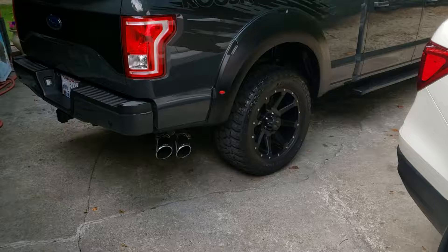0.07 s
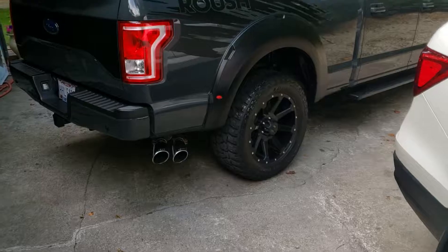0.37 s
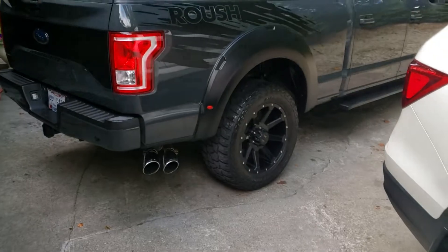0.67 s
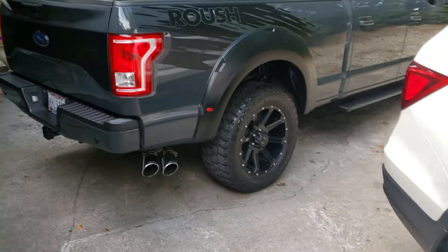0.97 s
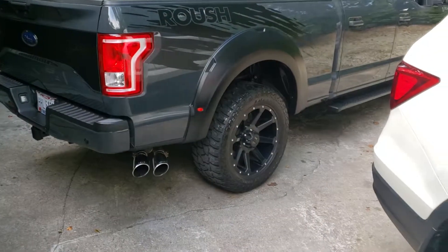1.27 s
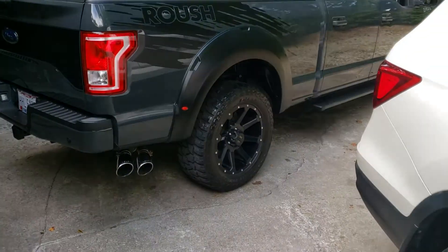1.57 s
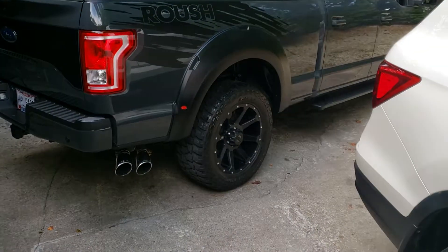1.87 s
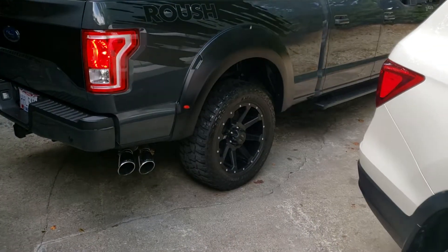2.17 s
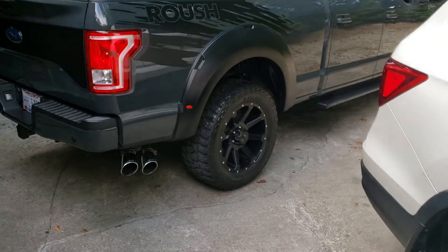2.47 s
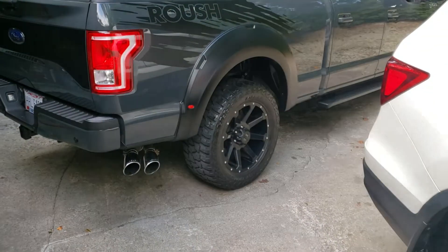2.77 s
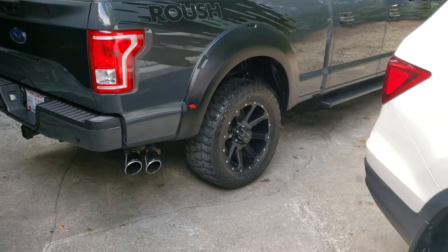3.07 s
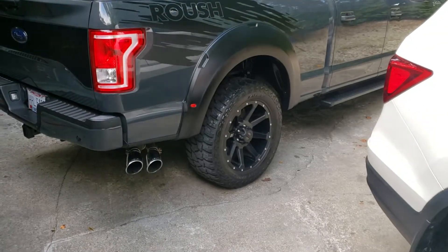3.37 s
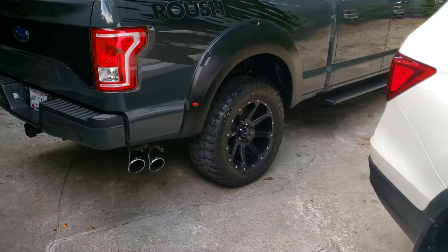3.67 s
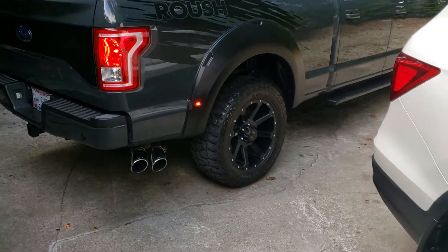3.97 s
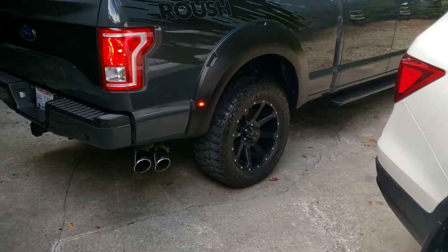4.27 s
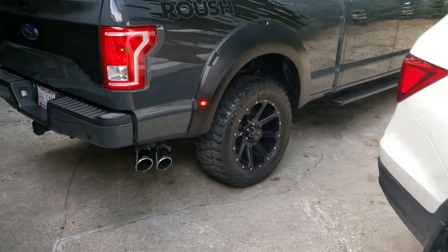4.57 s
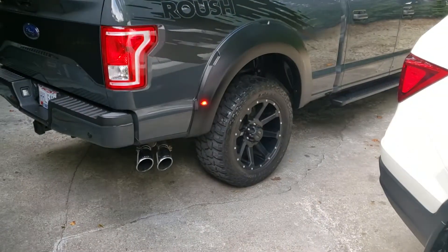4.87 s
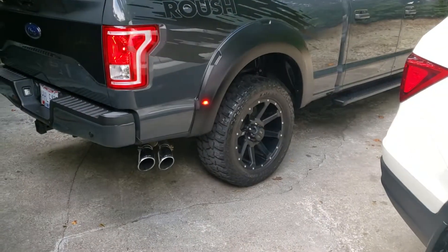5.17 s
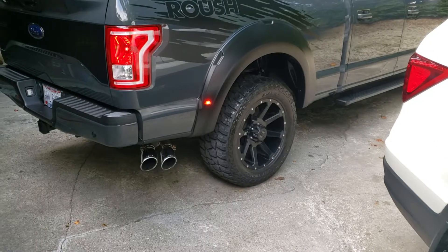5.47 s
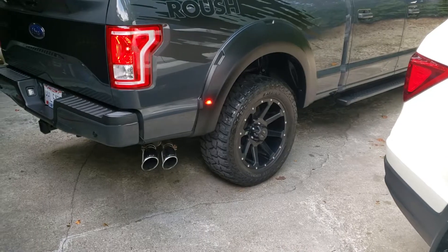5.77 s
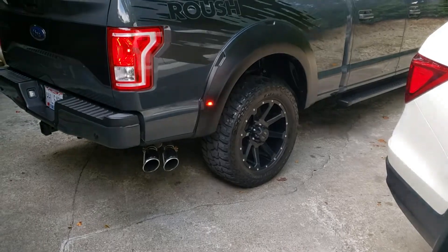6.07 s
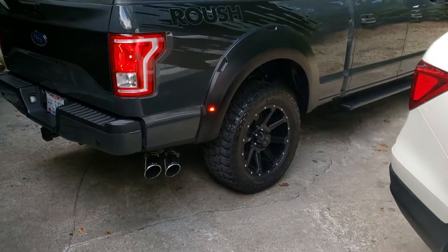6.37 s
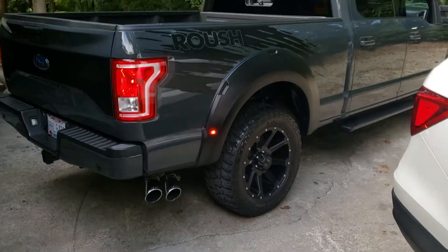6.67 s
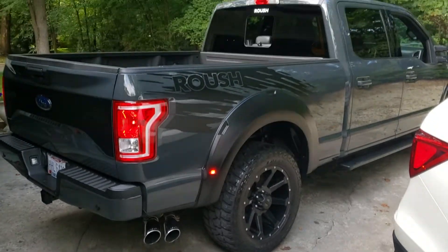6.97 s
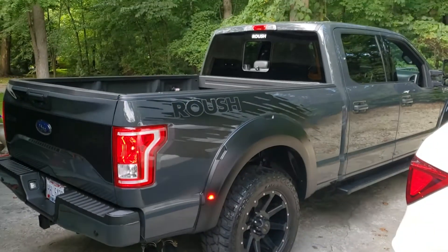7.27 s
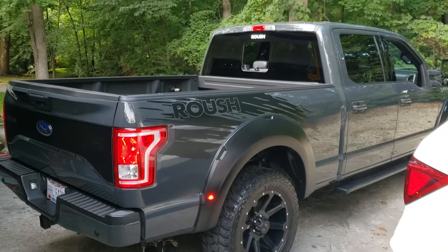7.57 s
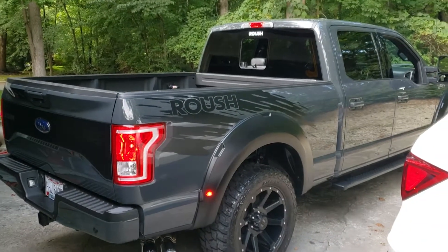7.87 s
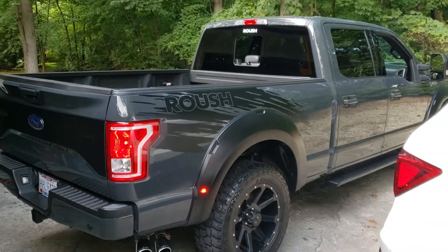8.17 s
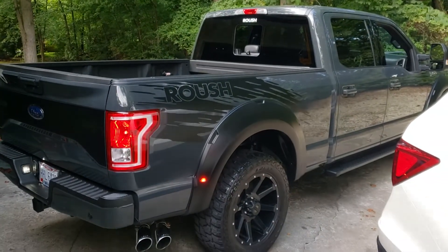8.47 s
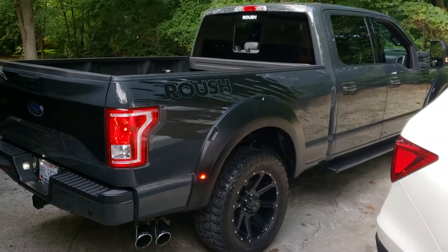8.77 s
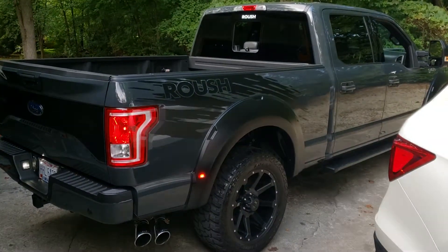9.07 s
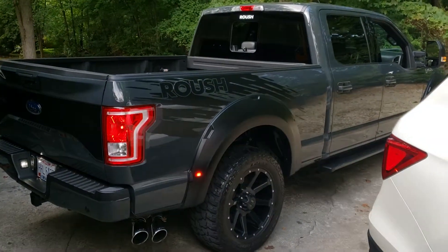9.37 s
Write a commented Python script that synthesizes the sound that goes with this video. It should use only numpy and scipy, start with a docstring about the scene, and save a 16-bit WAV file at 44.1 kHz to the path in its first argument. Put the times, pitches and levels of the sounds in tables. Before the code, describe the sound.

After a few quiet ticks and thumps, a pickup truck cranks and starts outdoors, idling with a chugging exhaust rumble.

```python
"""A V8 pickup starts up on a driveway, a few metres from the listener. Its starter motor clashes in and
cranks for 0.7 s; the engine catches with a few barks, revs up and settles to an uneven fast idle.
Each firing makes the exhaust pipes ring and adds a rasp of gas, while the engine bay clatters and hisses.
Before the start come dry ticks, soft thumps and thin squeaks, over a low, wavering two-note hum
that slowly fades."""
import sys
import numpy as np
from scipy import signal
from scipy.fft import rfft, irfft
from scipy.io import wavfile
from scipy.ndimage import uniform_filter1d

SR = 44100
rng = np.random.default_rng(int(sys.argv[2]) if len(sys.argv) > 2 else 0)


def master(y):
    """Save y as 16-bit WAV."""
    cut = np.clip(np.atleast_2d(y).T, -1, 1)
    pcm = np.round(cut * 32767)  # scale
    wavfile.write(sys.argv[1], SR, pcm.astype(np.int16))


N = 414981
TIME = np.arange(N) / SR
FREQS = np.maximum(np.arange(8193) * SR / 16384, 1)  # the pitches at which filters are drawn [Hz]

# Levels in the tables are relative. A "mode" is a pitch at which something likes to ring.
# how fast the engine fires (time [s], firings per second [Hz])
FIRING_RATE = [(4.9, 61.61), (4.98, 82.9), (5.04, 75.9), (5.11, 91.68), (5.2, 99.59), (5.42, 100.85),
               (5.52, 93.11), (5.8, 89.52), (6.2, 85.77), (6.5, 82.76), (7.2, 80.39), (7.7, 80.81),
               (8.25, 81.78), (8.55, 83.99), (8.75, 81.53), (9.0, 81.96), (9.41, 87.24)]
# how hard the engine works (time [s], level [dB])
ENGINE_LOAD = [(5.6, 1), (6.2, 0.5), (6.6, 0), (7.35, -1), (7.7, .7), (8.3, 4), (8.8, 3), (9.3, 4)]
# the eight cylinders in firing order (lateness [gaps between firings], level [dB], sharpness [dB])
FIRING_ORDER = [(.51, 0.9, 6), (.53, 1.8, 1), (.43, -1, 6), (.54, 1.4, 3), (0.3203, -1.1, 5.5),
                (.39, 0, 8.5), (0.4966, 0.9, 2), (0.2972, 0.5, 5.5)]
# the exhaust's deep boom, fuller body, rasp and high-rev roar (pitch [Hz], width [Hz], level [dB])
BOOM_MODES = [(50.3, 3.6, -0.5), (79.8, 18.9, 7), (113, 3.1, -18.5)]
BODY_MODES = [(148.3, 6.5, -3), (177.7, 9.45, 7), (219, 5.5, -12), (251, 10, 2), (315, 8.3, -10.5),
              (329.5, 6.3, -9), (371.7, 16, -10)]
RASP_MODES = [(460, 22, -1), (502, 12, 1), (558, 16, 2), (622, 16, -1), (696, 20, -1), (772, 26, 2),
              (840, 20, 0), (905, 12, -4), (982, 22, 2), (1080, 50, -6), (1235, 30, -10), (1370, 50, -6),
              (1510, 50, -7), (1680, 80, -9), (2950, 300, -20)]
ROAR_MODES = [(197, 21, -11), (594, 14, 14.5)]
# hard firings as the engine catches (time [s], level [dB])
CATCH_BARKS = [(4.912, -21.5), (4.954, -13.5), (4.987, -7.5), (5.0, -14), (5.097, -8.5), (5.171, -7.5),
               (5.183, -9.5), (5.193, -18), (5.251, -9), (5.273, -14), (5.361, -15.5), (5.451, -25)]
# puffs from the tailpipes while the starter turns the engine (time [s], level [dB])
CRANK_PUFFS = [(4.23, -36), (4.46, -27.5), (4.585, -36.5), (4.88, -26.5), (4.911, -11.5)]
# how fast the starter's gear teeth meet (time [s], teeth per second [Hz])
TOOTH_RATE = [(4.2, 189.8), (4.28, 200.6), (4.36, 227.8), (4.5, 248.8), (4.7, 265), (4.9, 289.7),
              (5.05, 417)]
# ringing of the metal case around the starter and its gears (pitch [Hz], width [Hz], level [dB])
HOUSING_MODES = [(332, 250, -14), (685, 81, -15.5), (935, 70, -6), (1235, 45, 3.5), (1477, 104, 0.5),
                 (1907, 33, -6), (2190, 156, -5.5), (2576, 130, -9.5), (3090, 190, -8), (3840, 300, -16.5),
                 (5440, 200, -21)]
# surges in the starter's whirr as each piston finishes squeezing its air (time [s], level [dB])
PISTON_SURGES = [(4.345, -30.5), (4.451, -29.5), (4.5, -30.5), (4.587, -26), (4.68, -26.5), (4.767, -28),
                 (4.835, -28), (4.91, -33), (4.975, -30.5)]
# whine of the starter's reduction gear (time [s], pitch [Hz])
WHINE_PITCH = [(4.24, 615), (4.35, 614), (4.49, 642), (4.57, 632), (4.64, 585), (4.69, 668)]
# the tones in that whine (multiple of the pitch, level against the whirr [dB])
WHINE_TONES = [(1, -22), (2, -8.5)]
# hiss of the starter's brushes, its sliding electric contacts (pitch [Hz], level [dB])
BRUSH_TONE = [(2500, -28), (4500, 5.5), (6500, 5), (8200, 1), (10000, 2), (13000, 2), (15500, 0.5)]
# clatter of valves and chains (pitch [Hz], width [Hz], level [dB])
CLATTER_MODES = [(1374, 140, 10.5), (1760, 100, -5.5), (2110, 17, 3), (2355, 95, 2), (2730, 74, 2),
                 (3140, 87, 1), (3850, 450, -7.5), (5140, 610, -14.5)]
# hiss of belts and fan (pitch [Hz], level [dB])
HISS_TONE = [(2500, -23), (4400, -9), (5100, 1), (6200, -6.5), (7300, -7), (10000, -8.5), (12700, -3.5),
             (16000, -13.5)]
# the loudest valve ticks (place in the cycle [firings], level [dB])
VALVE_TICKS = [(2.5, -44), (5.5, -43), (7.55, -47)]
# ringing of those valves (pitch [Hz], width [Hz], level [dB])
VALVE_MODES = [(2960, 230, 2), (5200, 600, -15)]
# dry ticks close by (time [s], level [dB], brightest pitch [Hz])
DRY_TICKS = [(1.352, -58, 2400), (1.461, -54, 2420), (1.584, -23, 2640), (1.7411, -15, 2550),
             (2.381, -38.5, 3570), (3.0785, -27, 1930), (3.1275, -22.5, 2600), (3.4542, -27, 1820),
             (3.571, -24.5, 1790), (3.584, -27, 2900), (3.5955, -27, 2740), (3.758, -30, 8800),
             (3.8357, -31.5, 8300), (4.0144, -38, 8900), (4.1604, -35, 2080)]
# the tone those ticks share (pitch [Hz], level [dB])
TICK_TONE = [(300, -36), (1000, -19), (1800, -5), (2600, -1), (3500, 0), (4500, -9), (5600, -2),
             (8500, -10), (12000, -1), (16000, -3)]
# soft thumps at the cab (time [s], level [dB], rise time [s], time to fade by 60 dB [s])
CAB_THUMPS = [(2.012, -33, 0.03, 0.31), (3.85, -40, 0.015, 0.33), (4.06, -47.5, 0.029, 0.45)]
# the dull tone of a thump (pitch [Hz], level [dB])
THUMP_TONE = [(40, -16), (90, -6), (140, 3.5), (220, -7), (310, -3.5), (450, -11.5), (1300, -8.5),
              (2500, -19), (5000, -31.5), (15000, -35.5)]
# the cab's boom after a thump (pitch [Hz], width [Hz], level [dB])
CAB_MODES = [(128.5, 4.3, 0.5), (157.7, 8, -2)]
# thin high squeaks (time [s], level [dB], time to fade by 60 dB [s])
HIGH_SQUEAKS = [(.286, -51, 0.13), (4.097, -42, 0.24)]
# the two notes of a low, wavering hum (pitch [Hz], starting level [dB])
HUM_NOTES = [(86.1, -49.5), (129.2, -51.5)]
# low outdoor rumble (pitch [Hz], width [Hz], level [dB])
RUMBLE_MODES = [(86.3, 12, 2), (138.8, 14, 0), (109, 65, -2.5), (264, 40, -13)]
# a faint far hoot (pitch [Hz], width [Hz], level [dB])
HOOT_MODES = [(586, 23, -6.5), (732, 31, -6)]
# outdoor air and insects (pitch [Hz], level [dB])
AIR_TONE = [(20, -21), (55, -18), (175, -26.5), (290, -31.5), (480, -29.5), (900, -31.5), (2200, -27.5),
            (3500, -41), (5400, -42), (6400, -31), (7800, -53), (16000, -50)]
# how much sound scatters off concrete and car panels (pitch [Hz], level [dB])
SCATTER_TONE = [(60, -36), (250, -29.5), (700, -8.5), (1300, -9), (2400, 1), (15000, -8)]
# how much louder the left side is than the right (pitch [Hz], level [dB])
LEFT_OVER_RIGHT = [(60, 3.5), (110, 1), (200, 1), (380, 1), (700, -2), (1290, 2), (2380, 10.5), (4400, -1),
                   (8120, 2), (15000, -12)]


def exhaust(catch_s=4.905, idle_hz=86, rev_span_hz=22, jitter=0.0092, chug_db=8.5):
    """Eight uneven firings a cycle ring the pipes; their sharp fronts and puffs of gas make the rasp."""
    rate, phase = engine_motion()
    load_db, = curves(ENGINE_LOAD)
    throttle = ramp(catch_s, 0.053) - ramp(5.18, 0.36)  # opens for the start, then closes to idle
    firings = np.arange(int(phase[-1]))
    late, size_db, sharp_db = np.array(FIRING_ORDER)[firings % len(FIRING_ORDER)].T
    # the faster the engine runs, the more alike its cylinders fire
    unevenness = np.clip(1 - (np.interp(firings, phase, rate) - idle_hz) / rev_span_hz, .25, 1)
    late = late.mean() + unevenness * (late - late.mean())
    time_luck, size_luck, sharp_luck = rng.standard_normal((len(firings), 3)).T
    times = np.interp(firings + late + jitter * time_luck, phase, TIME)
    # the fuel burns raggedly for the first half second
    scatter_db = 1.53 + 2.5 * np.exp(-(times - times[0]) / 0.4)
    size_db = unevenness * size_db + scatter_db * size_luck
    pulses = impulses(times, undb(size_db))
    fronts = impulses(times, undb(size_db / 2 + sharp_db + 3.5 * sharp_luck))
    gas = undb(-31) * fade(fronts, t60=0.17) * noise()
    # each front bounces around in the silencer and under the truck bed
    rebounds = undb(-3) * add_echoes(fronts, t60=0.11)
    blast = fronts + rebounds + gas
    boom = even(ring(pulses, resonances(BOOM_MODES))) * undb(-17.5 + load_db + 7 * throttle)
    body_db = -25 + load_db + 7.5 * throttle * (1 - ramp(5.05, 0.54))
    body = even(ring(pulses, resonances(BODY_MODES))) * undb(body_db) * ramp(catch_s, 0.072)
    # the rasp grows with throttle and revs; at high revs gas roars through the silencer
    revs = np.clip((rate - idle_hz) / rev_span_hz, 0, 1)
    rasp_gain = undb(-36 + 0.81 * load_db + 9.5 * throttle * (1 + revs) / 2)
    rasp = even(ring(blast, resonances(RASP_MODES))) * rasp_gain
    roar = even(ring(blast, resonances(ROAR_MODES))) * rasp_gain * revs
    # at idle the two rows of cylinders nearly cancel once a cycle: the chug of a V8
    firings_from_dip = (phase - 2.1 + 4) % 8 - 4
    chug = undb(-chug_db * ramp(5.4, .6) * np.exp(-(firings_from_dip / .8) ** 2))
    running = ramp(catch_s, 0.059) * (chug * (boom + body) + rasp + roar)
    barks = blows(CATCH_BARKS, resonances(RASP_MODES) + resonances(BODY_MODES))
    puffs = blows(CRANK_PUFFS, resonances([(87, 20, 0)]))
    return -(running + barks + puffs)


def starter(engage_s=4.236, let_go_s=4.99, run_down_db_per_s=204, whirr_db=-35.5, throb_hz=44):
    """Gear teeth knock and grind as they turn the engine, louder and faster as each piston gives way."""
    tooth_rate, = curves(TOOTH_RATE)
    whine_hz, = curves(WHINE_PITCH)
    cranking = ramp(engage_s - .02, .02) * undb(-run_down_db_per_s * np.maximum(TIME - let_go_s, 0))
    steady = undb(whirr_db) * cranking
    clash = swell(engage_s, rise=0.0086, t60=0.29)
    surges = sum(undb(db) * swell(s, rise=0.0078, t60=0.25) for s, db in PISTON_SURGES)
    surge_db = 20 * np.log10(1 + surges / undb(whirr_db))
    speed = 1 + 0.00926 * (surge_db - uniform_filter1d(surge_db, size=6000))
    phase = np.cumsum(tooth_rate * speed) / SR
    # the reduction gear whines only at first
    turns = np.cumsum(whine_hz * (1 + 0.0082 * drift(120))) / SR
    whine = sum(undb(db + 2 * drift(40)) * unit(np.sin(2 * np.pi * n * turns)) for n, db in WHINE_TONES)
    whine_gain = (steady + surges / 2) * (1 - ramp(4.6, 0.15))
    tooth_numbers = np.arange(int(phase[-1]))
    time_luck, size_luck = rng.standard_normal((len(tooth_numbers), 2)).T
    teeth = impulses(np.interp(tooth_numbers + 0.034 * time_luck, phase, TIME), undb(1.5 * size_luck))
    grind = unit(fade(teeth, t60=0.09) * noise())
    knocks = unit(add_echoes(teeth, t60=0.079))
    whirr = unit(ring(knocks + grind, resonances(HOUSING_MODES)))
    whirr_gain = np.hypot(steady, surges + undb(-17.5) * clash)
    # the brushes hiss 8 dB louder with each doubling of speed
    brushes = unit(ring(grind, tone(BRUSH_TONE) + resonances([(10950, 64, 2)])))
    brush_gain = np.hypot(undb(-41.5 + 8 * np.log2(tooth_rate / 250)) * cranking, undb(-24.5) * clash)
    # the motor spins slightly off centre
    throb = undb(1.3 * np.sin(2 * np.pi * throb_hz * TIME))
    return throb * (whirr * whirr_gain + whine * whine_gain + brushes * brush_gain)


def engine_bay(build_db_per_s=0.9):
    """Valves and chains rustle, belts and fan hiss; they follow the load and slowly grow."""
    load_db, = curves(ENGINE_LOAD)
    gulp_db = 11 * (1 - ramp(5.12, 0.22))  # air drawn in as the engine catches
    effort_db = 1.37 * load_db + gulp_db + build_db_per_s * (TIME - TIME[-1])
    flutter_db = 4.5 * drift(220)
    clatter = undb(-51.5 + flutter_db) * shaped_noise(resonances(CLATTER_MODES))
    hiss = undb(-61 + flutter_db / 2) * shaped_noise(tone(HISS_TONE))
    return ramp(4.95, 0.13) * undb(effort_db) * (clatter + hiss)


def valves(t60=0.041):
    """A few valves tick louder than the rest, once each engine cycle."""
    rate, phase = engine_motion()
    loudness = np.zeros(N)
    for place, db in VALVE_TICKS:
        since_tick_s = (phase - place) % len(FIRING_ORDER) / rate
        loudness += undb(db - 60 * since_tick_s / t60)
    return ramp(5.72, 0.5) * loudness * shaped_noise(resonances(VALVE_MODES))


def snap(at_s=5.4233, db=-7):
    """One hard click at 5.42 s."""
    return -undb(db) * fade(impulses([round(at_s * SR) / SR], 1), t60=0.0095)


def ticks(crack_t60=0.0082, echo_t60=0.13, ping_t60=0.0097):
    """Tiny dry cracks, each with a brief ping and a faint echo from the cars."""
    out, t = np.zeros(N), TIME[:SR // 10]
    for s, db, hz in DRY_TICKS:
        crack = rng.standard_normal(len(t)) * (undb(-60 * t / crack_t60) + undb(-26 - 60 * t / echo_t60))
        crack = ring(crack, tone(TICK_TONE) * (1 + resonances([(hz, 0.27 * hz, 6)])))
        ping = np.sin(2 * np.pi * hz * t) * undb(-7.5 - 60 * t / ping_t60)
        tick = crack / np.abs(crack).max() + ping
        start = int(s * SR)
        out[start:start + len(t)] += tick * undb(db) / np.abs(tick).max()
    return out


def thumps():
    """Cushioned knocks swell in and die away quickly, leaving a low boom in the cab."""
    knock = sum(undb(db) * swell(s, rise, t60) for s, db, rise, t60 in CAB_THUMPS)
    boom = sum(undb(db - 9) * swell(s + rise, rise, t60=1.1) for s, db, rise, _ in CAB_THUMPS)
    return knock * shaped_noise(tone(THUMP_TONE)) + boom * shaped_noise(resonances(CAB_MODES))


def squeaks():
    """Brief, very high whistles."""
    loudness = sum(undb(db) * fade(impulses([s], 0.99), t60) for s, db, t60 in HIGH_SQUEAKS)
    return loudness * shaped_noise(resonances([(13390, 70, 3), (11200, 50, -13)]))


def hum(fade_db_per_s=2.5):
    """A low, wavering two-note hum that slowly fades."""
    notes = sum(unit(np.sin(2 * np.pi * hz * TIME)) * undb(db + 2 * drift(6)) for hz, db in HUM_NOTES)
    return notes * undb(-fade_db_per_s * TIME)


def rumble():
    """A low outdoor rumble whose level wanders a little."""
    return shaped_noise(resonances(RUMBLE_MODES)) * undb(-51.5 + drift(24))


def hoot(at_s=2.51):
    """One faint far hoot."""
    return undb(-58) * np.exp(-((TIME - at_s) / .14) ** 2) * shaped_noise(resonances(HOOT_MODES))


def air():
    """Steady outdoor air with a band of insect hiss."""
    return shaped_noise(tone(AIR_TONE)) * undb(-54.5 + .5 * drift(2.8))


def engine_motion():
    """The engine's firings per second, and its phase: a running count of firings."""
    rate, = curves(FIRING_RATE)
    return rate, np.cumsum(rate * (TIME > FIRING_RATE[0][0])) / SR


def undb(db):
    """Turn decibels into a gain, the number a sound is multiplied by."""
    return 10 ** (np.asarray(db) / 20)


def unit(x):
    """Scale a sound to an average power of 1."""
    return x / np.sqrt(np.mean(x ** 2))


def even(x):
    """Hold the power near 1 from one engine cycle to the next, except where it is very quiet."""
    power = uniform_filter1d(uniform_filter1d(x ** 2, size=4300), size=4300)
    return x / np.sqrt(np.maximum(power, .01 * power.max()))


def curves(rows):
    """Join a table's points into lines through time."""
    s, *columns = np.transpose(rows)
    return [np.interp(TIME, s, column) for column in columns]


def ramp(start, length):
    """A straight rise from 0 to 1, with start and length in seconds."""
    return np.clip((TIME - start) / length, 0, 1)


def swell(at, rise, t60):
    """Grow to 1 at the given time, then fall 60 dB every t60 seconds."""
    return np.exp(np.minimum((TIME - at) / rise, (at - TIME) * np.log(1000) / t60))


def fade(x, t60):
    """Give every click a tail that falls 60 dB in t60 seconds."""
    return signal.lfilter([1], [1, -np.exp(-np.log(1000) / (t60 * SR))], x)


def noise():
    """White noise: an even hiss."""
    return rng.standard_normal(N)


def shaped_noise(gain):
    """Filtered noise with a power of 1."""
    return unit(ring(noise(), gain))


def drift(rate):
    """A smooth random wander that turns about `rate` times a second."""
    step = int(SR / rate)
    return uniform_filter1d(np.repeat(rng.standard_normal(N // step + 1), step), step)[:N]


def tone(points):
    """A filter shape drawn through (pitch [Hz], level [dB]) points."""
    hz, db = np.transpose(points)
    return undb(np.interp(np.log(FREQS), np.log(hz), db))


def resonances(modes):
    """A filter shape with one steep peak for each mode."""
    return sum(undb(db) / (1 + ((FREQS ** 2 - hz ** 2) / (2 * FREQS * width)) ** 2)
               for hz, width, db in modes)


def ring(x, gain):
    """Pass a sound through a filter of the given shape."""
    cepstrum = irfft(np.log(gain + 1e-5))
    half = len(cepstrum) // 2
    # folding onto the first half makes the ringing follow each hit, never lead it
    cepstrum[1:half] *= 2
    cepstrum[half + 1:] = 0
    response = irfft(np.exp(rfft(cepstrum)))[:half]
    return signal.oaconvolve(x.astype(np.float32), response.astype(np.float32))[:len(x)]


def impulses(times, sizes):
    """Clicks at the given times, each shared between two samples."""
    at = np.clip(np.asarray(times) * SR, 0, N - 2)
    i = at.astype(int)
    return np.bincount(i, sizes * (1 - at + i), N) + np.bincount(i + 1, sizes * (at - i), N)


def blows(rows, gain):
    """Single hits (time [s], level [dB]) that ring one filter."""
    s, db = np.transpose(rows)
    hits = ring(impulses(s, undb(db)), gain)
    return hits * undb(db.max()) / np.abs(hits).max()


def add_echoes(x, t60):
    """Smear a sound into a dense cluster of fading echoes."""
    t = TIME[:SR // 8]
    tail = rng.standard_normal(len(t)) * undb(-60 * t / t60)
    return signal.oaconvolve(x, tail / np.linalg.norm(tail))[:N]


def spread(mid, t60):
    """Low notes reach both sides alike; high ones also scatter off concrete and car panels."""
    side = add_echoes(ring(mid, tone(SCATTER_TONE)), t60)
    return np.array([mid + side, mid - side])


def scene():
    """Mix to left and right: the exhaust comes from one direction, the ticks are close and dry."""
    direct = exhaust() + squeaks() + thumps() + rumble() + hum() + hoot()
    # sound from under the bonnet arrives by many paths, so each side gets its own
    indirect = np.array([np.sqrt(2) * (engine_bay() + valves() + starter()) + air() for _ in range(2)])
    return spread(direct, t60=0.016) + spread(ticks(), t60=0.0013) + indirect + snap()


def record(dry, top_hz=15800):
    """Give each side its own tone, fade in after 0.1 s, clip the peaks and cut the highest treble."""
    tilt = tone(LEFT_OVER_RIGHT)
    sides = np.array([ring(dry[0], 2 * tilt / (1 + tilt)), ring(dry[1], 2 / (1 + tilt))])
    treble_cut = signal.ellip(10, .2, 80, top_hz, fs=SR, output="sos")
    return signal.sosfilt(treble_cut, np.clip(sides * ramp(.1, .01), -1, 1))


dry = scene()
out = record(dry)
master(out)
```